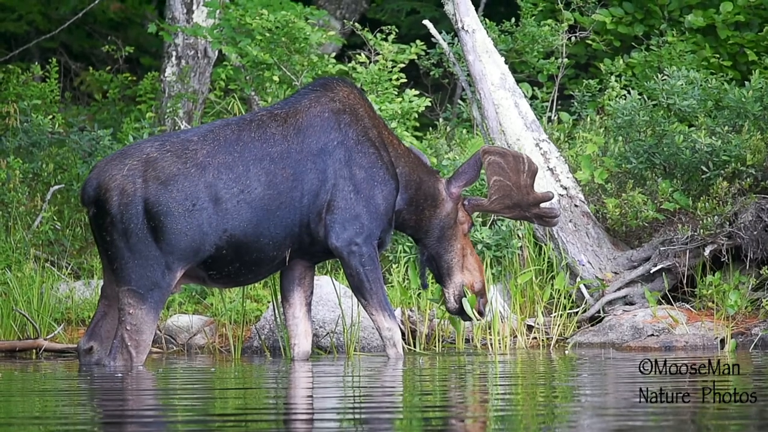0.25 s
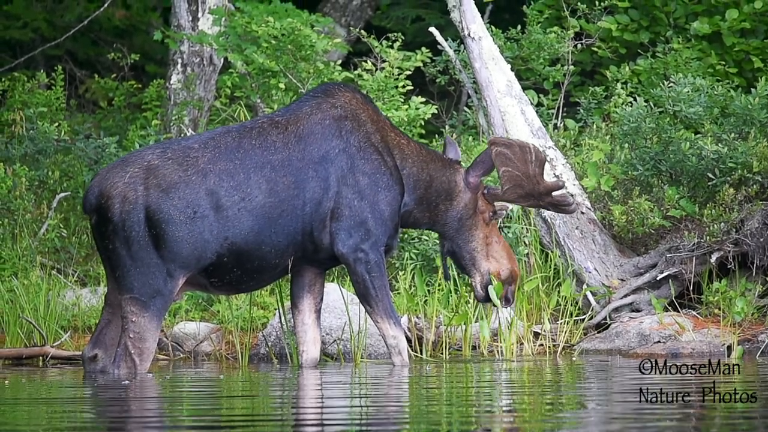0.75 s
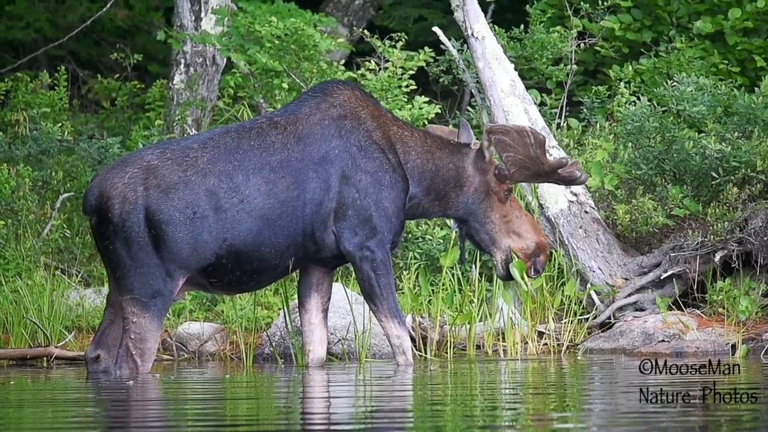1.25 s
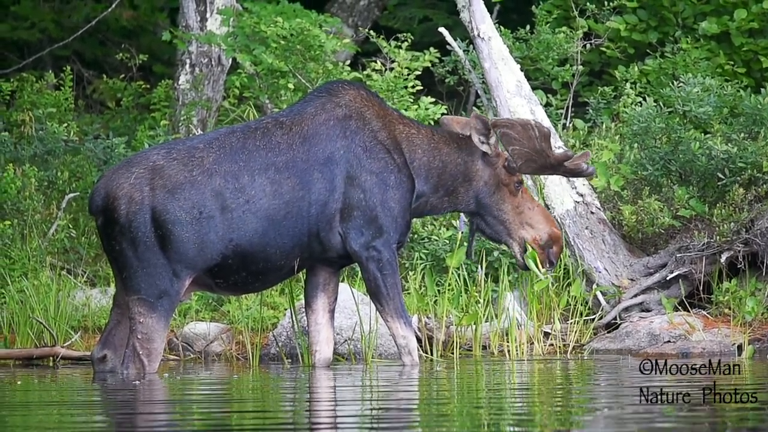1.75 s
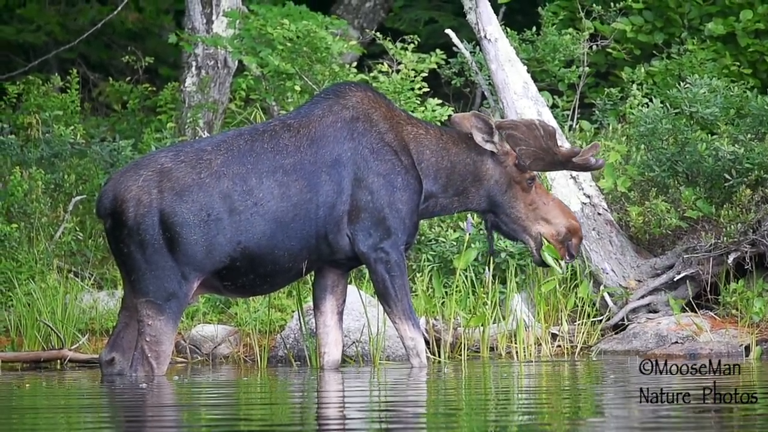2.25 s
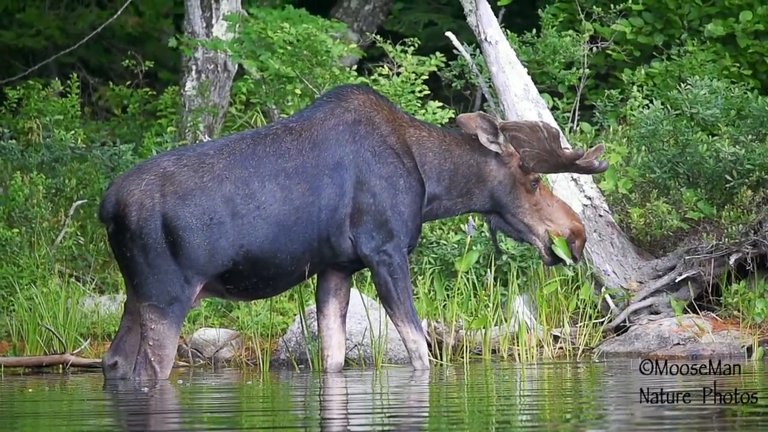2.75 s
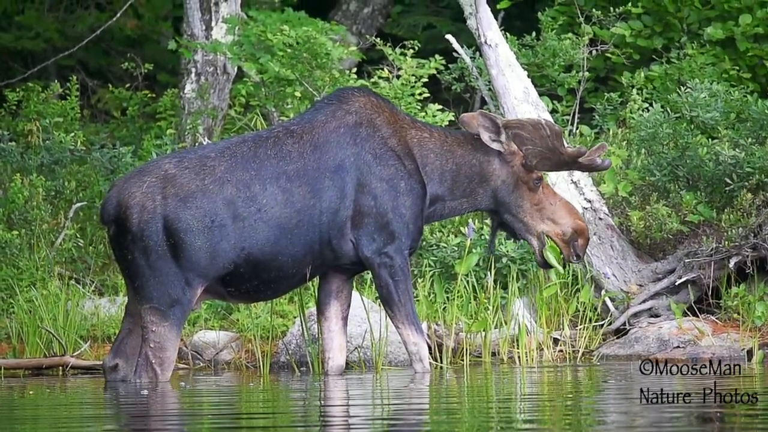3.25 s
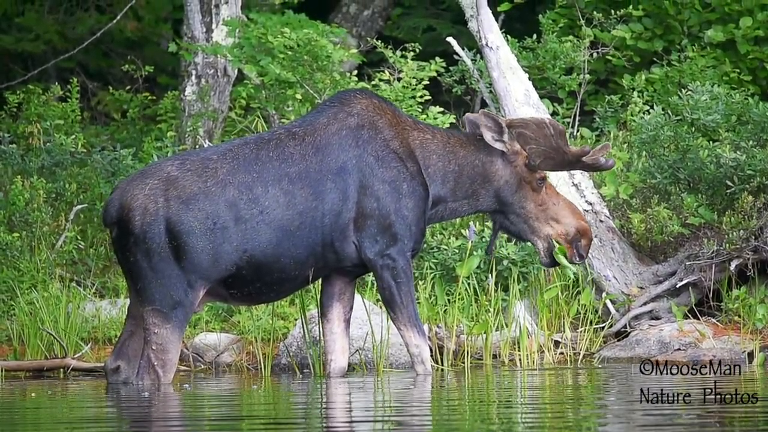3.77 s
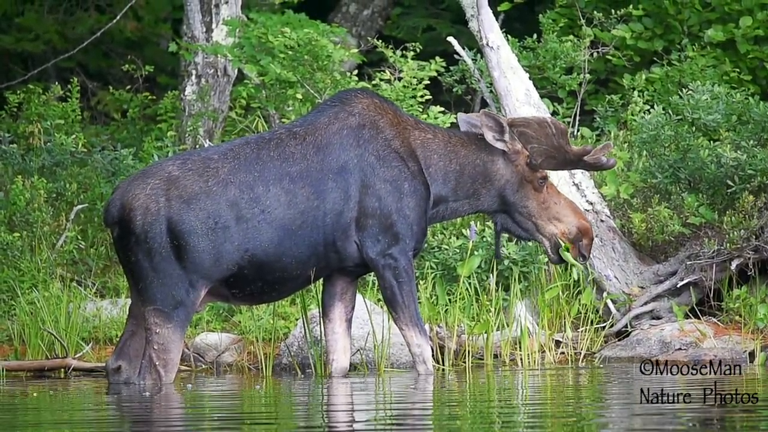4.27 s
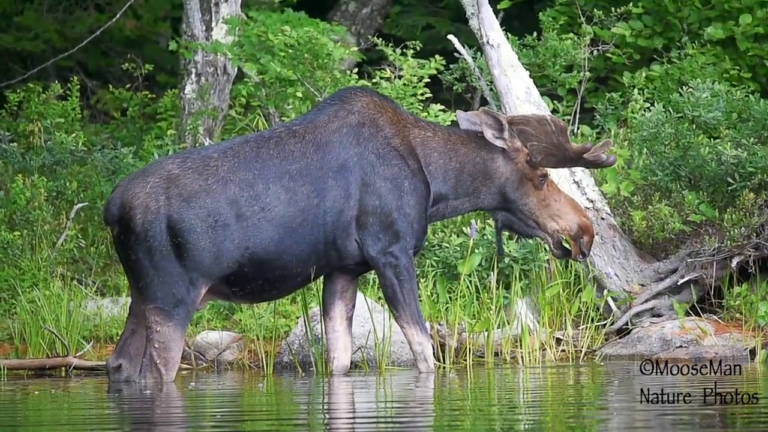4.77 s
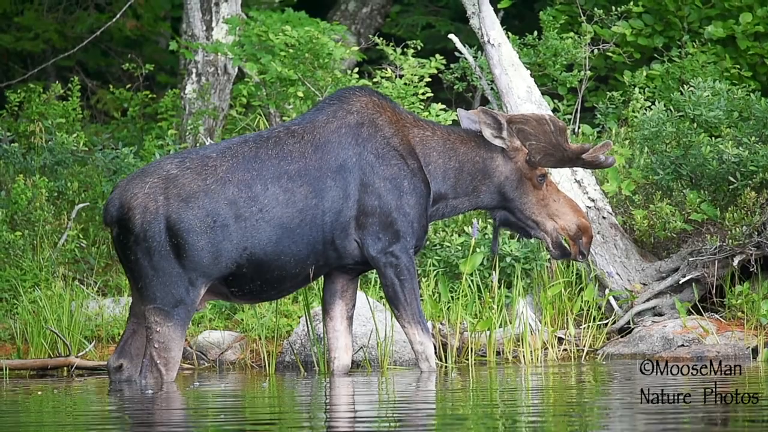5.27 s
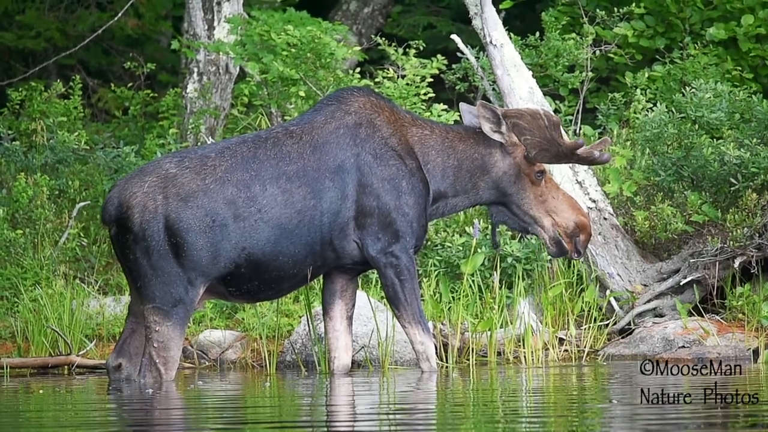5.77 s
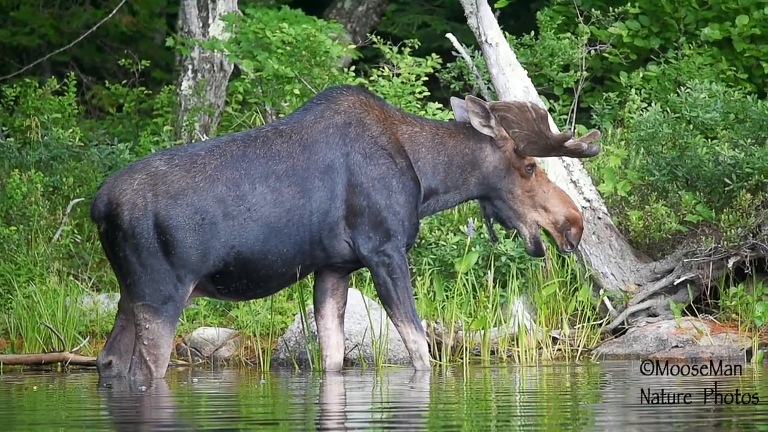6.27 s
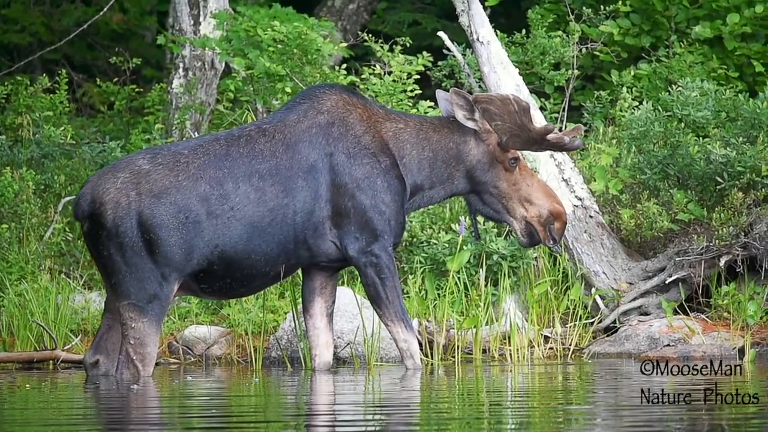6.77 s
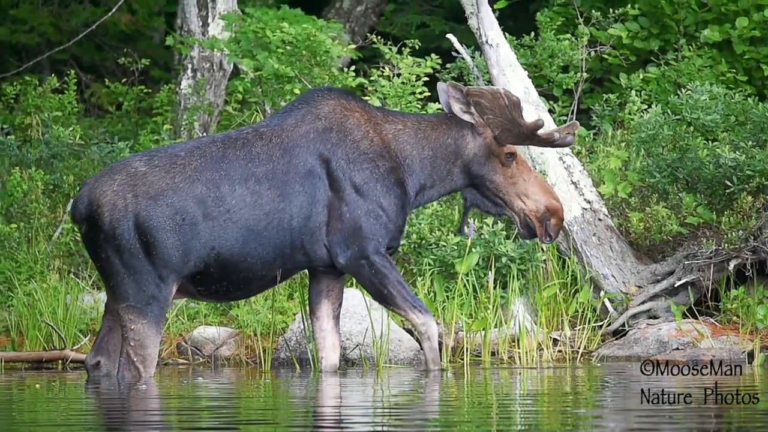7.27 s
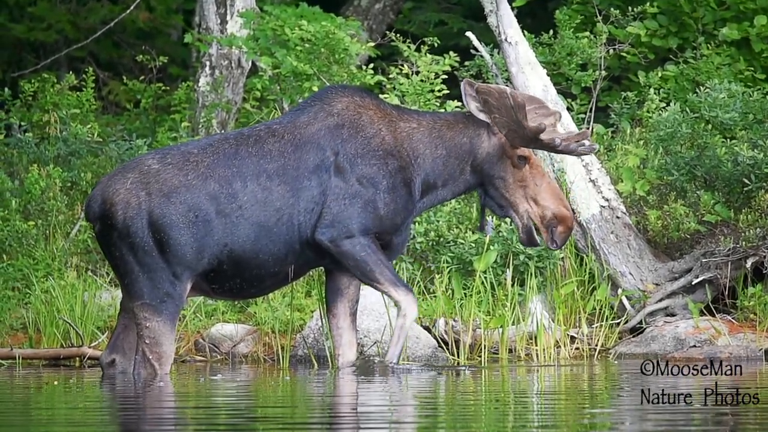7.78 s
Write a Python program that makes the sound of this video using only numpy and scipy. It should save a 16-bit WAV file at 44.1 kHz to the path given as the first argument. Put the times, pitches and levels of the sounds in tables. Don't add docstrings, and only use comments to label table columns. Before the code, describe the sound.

A calm forest lake outdoors: a soft, broad hush of distant trees and water, with low wind rumble on the microphone, strongest in the first second and nearly gone by 7 s. From the start a moose feeds in the shallows, with wet leaves snapping and rustling irregularly, a quick tearing at 0.6 and 4.7 s, and scattered drips plinking or plopping. Far songbirds whistle thin falling chirps, busiest from 1.3 to 2.3 s. At 2.45 s a loon sounds a short low note that breaks into a clear, rapid high quaver until 3.1 s, dropping at the end. A second, longer call runs from 3.5 to 4.3 s. Forested shores return both as a diffuse smear fading through about 7 s. From 7.4 s to the end at 8 s, the moose steps: gulping bubbles, frothy splash and last leaf crunches.

```python
import sys
import numpy as np
from scipy import signal
from scipy.fft import rfft, irfft, next_fast_len
from scipy.io import wavfile
from scipy.ndimage import uniform_filter1d

SR = 44100
rng = np.random.default_rng(int(sys.argv[2]) if len(sys.argv) > 2 else 0)


def store_pcm(level_fs):
    pcm = np.round(np.clip(level_fs, -1, 1) * 32767).astype(np.int16)
    wavfile.write(sys.argv[1], SR, np.atleast_2d(pcm).T)


def ratio_of_db(decibels):
    return 10 ** (np.asarray(decibels, float) / 20)


N = 354123


def band(x, lo_hz, hi_hz):
    return signal.sosfilt(signal.butter(2, [lo_hz, hi_hz], "bandpass", fs=SR, output="sos"), x)


def walk(rate):
    k = int(SR / rate)
    held = np.repeat(rng.standard_normal(N // k + 1), k)
    return 1.9 * uniform_filter1d(uniform_filter1d(held, k), k)[:N]


def add(out, start_s, piece):
    i = int(start_s * SR)
    out[i:i + len(piece)] += piece[:N - i]


def curve(rows):
    return ratio_of_db(np.interp(np.arange(N) / SR, *np.transpose(rows)))


def hush():
    # (frequency [Hz], density [dB per Hz])
    hush_spectrum = [(12, -29), (22, -13), (45, -10.5), (77, -1.5), (130, -5), (200, -6.5), (320, -12.5),
                     (450, -17), (1000, -18.5), (1600, -23), (2800, -25), (5000, -32), (11000, -41.5),
                     (16000, -49)]
    size = next_fast_len(N)
    f = np.fft.rfftfreq(size, 1 / SR) + 1
    hz, db = np.transpose(hush_spectrum)
    spectrum = rfft(rng.standard_normal(size)) * ratio_of_db(np.interp(np.log(f), np.log(hz), db))
    out, swell = 0, walk(1.0)
    for k in range(-1, 10):
        octave = np.cos(np.pi / 2 * np.clip(np.log2(np.maximum(f, 15.6) / 25.6) - k, -1, 1)) ** 2
        moving_db = .3 * swell + .5 * walk(1.2) + .7 * walk(9)
        out = out + irfft(spectrum * octave, size)[:N] * ratio_of_db(moving_db)
    return out * ratio_of_db(-44) / np.std(out)


def wind():
    # (time [s], level [dB])
    gusts = [
        (0, -48.5),
        (1, -50),
        (1.4, -55),
        (3, -59.5),
        (5, -56),
        (7.2, -86),
        (8.03, -62),
    ]
    rumble = band(rng.standard_normal(N), 18, 50)
    hollow = band(rng.standard_normal(N), 650.5, 667.6)
    hum_gain = ratio_of_db(-67 + 3 * walk(12))
    return curve(gusts) * rumble / np.std(rumble) + hum_gain * hollow / np.std(hollow)


def whistle(length_s, from_hz, to_hz, bend, db, hold_s=0):
    u = np.arange(0, length_s + hold_s, 1 / SR) / length_s
    way = np.minimum(u, 1)
    hz = from_hz + (to_hz - from_hz) * (4 * bend * way * (1 - way) + way * (2 * way - 1))
    fade_db = 10.5 * np.tanh(np.maximum(u - 1, 0) / .4)
    edges = signal.windows.tukey(len(u), .2 * length_s / (length_s + hold_s / 2))
    return ratio_of_db(db + 2.2 - fade_db) * edges * np.sin(2 * np.pi * np.cumsum(hz) / SR)


def songbirds():
    # (start [s], top [Hz], bottom [Hz], level [dB])
    falling = [(0.335, 5200, 3650, -58), (1.21, 4650, 3850, -64), (1.48, 4600, 3930, -52.5),
               (2.01, 5350, 4050, -57), (2.33, 4500, 2950, -63), (3.565, 4950, 4350, -61),
               (5.13, 5150, 4000, -63), (6.13, 5200, 3950, -62), (6.7, 5100, 3700, -67),
               (7.14, 5300, 3700, -64), (7.33, 5100, 3900, -66), (7.49, 3900, 3200, -64),
               (7.62, 3900, 3300, -68)]
    # (start [s], top [Hz], bottom [Hz], level [dB])
    replies = [
        (0.495, 5000, 3750, -56.5),
        (2.175, 5080, 4300, -58),
        (3.72, 5100, 4600, -61),
        (5.29, 5050, 4150, -61),
    ]
    # (start [s], from [Hz], to [Hz], level [dB], hold [s])
    slurs = [
        (1.325, 5200, 5800, -64, 0),
        (1.38, 4100, 4860, -60, .075),
        (1.585, 5150, 5500, -55.5, .07),
        (1.646, 3850, 4780, -53.5, .11),
        (1.735, 6110, 6150, -60, .125),
        (1.925, 5100, 5750, -55.5, .12),
        (3.93, 6400, 7250, -61, 0),
    ]
    # (start [s], length [s], from [Hz], to [Hz], level [dB])
    flicks = [
        (1.628, 0.028, 4530, 3850, -50),
        (1.797, 0.033, 5980, 5150, -53),
        (1.84, 0.054, 5500, 5000, -63),
        (1.889, 0.0217, 5010, 4040, -49.5),
        (1.905, 0.012, 4080, 4600, -53),
    ]
    song_bend = 0.54
    out = np.zeros(N)
    for chirps, bend in (falling, .35), (replies, .13):
        for s, top_hz, bottom_hz, db in chirps:
            length_s = .033 + (top_hz - bottom_hz) / 38000
            add(out, s, whistle(length_s, top_hz, bottom_hz, bend, db))
    for s, from_hz, to_hz, db, hold_s in slurs:
        add(out, s, whistle(.04, from_hz, to_hz, song_bend, db, hold_s))
    for s, length_s, from_hz, to_hz, db in flicks:
        add(out, s, whistle(length_s, from_hz, to_hz, song_bend, db))
    t = np.arange(int(.4 * SR)) / SR
    blur = rng.standard_normal(len(t)) * np.exp(-t / .1) * ratio_of_db(-35.5)
    return out * ratio_of_db(2 * walk(90)) + signal.fftconvolve(out, blur)[:N]


def water():
    # (time [s], peak [dB], pitch [Hz], ring [s])
    drips = [(0.25, -34.5, 1360, 0.036), (0.86, -39, 2230, 0.039), (1.0188, -20.5, 3200, 0.0063),
             (1.242, -32, 1410, 0.027), (1.6995, -13.5, 910, 0.0047), (1.9445, -15.5, 1060, 0.007),
             (2.045, -44, 3460, 0.024), (2.103, -29.5, 4220, 0.013), (2.104, -35, 2980, 0.014),
             (2.61, -38, 518, 0.13), (3.2, -36, 1016, 0.076), (3.645, -16.5, 332, 0.023),
             (4.3, -33, 410, 0.052), (4.955, -37, 1930, 0.026), (5.245, -26, 341, 0.049),
             (5.44, -35, 2293, 0.022), (7.814, -30, 1042, 0.15)]
    # (time [s], peak [dB])
    laps = [
        (2.47, -41),
        (2.62, -40),
        (2.99, -40),
        (3.72, -39),
    ]
    # (time [s], peak [dB], pitch [Hz])
    gulps = [(7.48, -39, 770), (7.497, -31, 800), (7.51, -36, 760), (7.555, -38, 1010), (7.59, -36, 680),
             (7.585, -41, 2150), (7.615, -37, 1370), (7.65, -36, 620), (7.685, -42, 3100),
             (7.708, -46, 4500), (7.714, -34, 528), (7.715, -37, 2130), (7.738, -39, 2400),
             (7.74, -47, 3600), (7.74, -28, 558), (7.764, -31, 544), (7.784, -22, 914), (7.8, -26, 850),
             (7.85, -30, 840), (7.852, -30, 1420), (7.868, -26, 600), (7.878, -37, 2700),
             (7.879, -41.5, 5400), (7.91, -36, 650), (7.92, -46, 4000), (7.945, -35, 600),
             (7.965, -35, 680), (7.98, -38, 800)]
    # (time [s], level [dB])
    froth = [
        (7.4, -64),
        (7.49, -49),
        (7.6, -48),
        (7.7, -47),
        (7.77, -43),
        (7.88, -42),
        (7.95, -43),
        (8.03, -44),
    ]
    s, db = np.transpose(froth)
    chance = rng.random((900, 3))
    times = s[0] + chance[:, 0] * (s[-1] - s[0])
    pitches = 450 * 2 ** (4.44 * chance[:, 1] ** 0.82)
    peaks_db = np.interp(times, s, db) + 6.5 - 3.0 * np.log(chance[:, 2]) - 3.8 * np.log2(pitches / 450)
    hollow_rings = [(*lap, 657, .13) for lap in laps]
    gulp_rings = [(s, db, hz, 0.056 * (800 / hz) ** 0.43) for s, db, hz in gulps]
    small = zip(times, peaks_db, pitches, 10 / pitches)
    out = np.zeros(N)
    for start_s, peak_db, hz, ring_s in [*drips, *hollow_rings, *gulp_rings, *small]:
        t = np.arange(int(ring_s * SR)) / SR
        rising = np.sin(2 * np.pi * hz * t * (.97 + 0.14 * t / ring_s))
        attack = 1 - np.exp(-t * hz / 2)
        add(out, start_s, ratio_of_db(peak_db) * rising * attack * 1000 ** (-t / ring_s))
    wash = band(rng.standard_normal(N), 450, 1300) + 0.15 * band(rng.standard_normal(N), 1300, 3900)
    return out + curve(froth) * ratio_of_db(11 + 2.2 * walk(30)) * wash


def tears():
    # (start [s], length [s], peak at 4-9 kHz [dB], duller part [dB], brighter part [dB])
    tear_runs = [
        (0.6055, .085, -44, -45, -51),
        (4.6823, .07, -46, -45, -55),
    ]
    gap_s, jitter_s, scatter_db, fade_db_s = .0125, .002, 2.5, 60
    rows = []
    for start_s, length_s, *dbs in tear_runs:
        for late_s in np.arange(0, length_s, gap_s):
            shift, *scatter = rng.standard_normal(4)
            time_s = start_s + late_s + jitter_s * shift * (late_s > 0)
            levels_db = np.array(dbs) + scatter_db * np.array(scatter) - fade_db_s * late_s
            rows.append((time_s, *levels_db))
    return rows


def rustle():
    # (start [s], hold [s], level [dB])
    bites = [
        (.12, 0.16, -63.5),
        (0.61, 0.038, -54.5),
        (.74, 0.088, -66),
        (1.537, 0.046, -58.5),
        (3.45, .22, -60.5),
        (4.15, .02, -55.5),
        (4.684, 0.064, -56.5),
        (7.52, 0.26, -63.5),
        (7.84, 0.13, -59.5),
    ]
    swell_db_s, fade_db_s = 250, 92
    t = np.arange(N) / SR
    power = ratio_of_db(-66.5) ** 2
    for s, hold_s, db in bites:
        before_s = np.maximum(s - t, 0)
        after_s = np.maximum(t - s - hold_s, 0)
        power = power + ratio_of_db(db - swell_db_s * before_s - fade_db_s * after_s) ** 2
    return np.sqrt(power)


def leaves():
    # (time [s], peak at 4-9 kHz [dB], duller part [dB], brighter part [dB])
    lone_snaps = [(0.0504, -41, -47, -69), (0.1301, -42, -54, -58), (0.155, -32, -44, -59),
                  (0.2034, -39, -58, -64), (0.225, -47, -48, -62), (0.5948, -34, -48, -42),
                  (0.7138, -43, -58, -64), (0.7625, -32, -58, -60), (0.7718, -41, -42.5, -62),
                  (1.0003, -40, -45.5, -55), (1.4694, -46, -41.5, -61), (1.7015, -54, -41, -67),
                  (2.7122, -37.5, -48, -67), (2.9324, -53, -46, -52), (3.1744, -52, -41, -67),
                  (3.4208, -29, -38, -49), (3.6491, -45, -50, -54), (4.1434, -50, -42, -51),
                  (4.1535, -39, -43, -69), (4.5594, -43, -59, -58), (4.5714, -38, -56, -53),
                  (5.78, -50, -47, -63), (6.0584, -49, -44, -66), (7.5044, -47, -51, -59),
                  (7.5994, -44, -47, -61), (7.744, -40, -44, -53), (7.879, -37, -44, -58),
                  (7.92, -43, -51, -55)]
    t = np.arange(int(.03 * SR)) / SR
    decay = np.exp(-t / 0.00055) + 0.13 * np.exp(-t / .005)
    layers = np.zeros((3, N))
    snaps = lone_snaps + tears()
    for (s, *dbs), noise in zip(snaps, rng.standard_normal((len(snaps), len(t)))):
        for layer, db in zip(layers, dbs):
            add(layer, s + .0006, ratio_of_db(db + 3.5) * noise * decay)
    flicker_db = 1.63 * walk(200) + 3.37 * np.array([walk(120) for _ in layers])
    balance = ratio_of_db(np.array([[-1], [-4], [-19]]))
    layers += rustle() * ratio_of_db(flicker_db) * rng.standard_normal((3, N)) * balance
    middle = band(layers[0], 4000, 9000)
    dull = band(layers[1], 1200, 4050)
    bright = band(band(layers[2], 9000, 13600), 8000, 13600)
    return ratio_of_db(-3.0) * middle + ratio_of_db(12.5) * dull + ratio_of_db(10.5) * bright


def shores(call):
    near_s, far_s = .26, 2.65
    t = np.arange(0, far_s + .3, 1 / SR)
    after = np.maximum(t - near_s, 0)
    near = ratio_of_db(-25 - 35 * after)
    woods = ratio_of_db(-23.5 - 11.5 * after)
    far = np.hypot(woods, ratio_of_db(-41 - 56 * np.maximum(t - far_s, 0)))
    swell_db = -62 * np.maximum(near_s - t, 0) + 2 * walk(25)[:len(t)]
    swell = ratio_of_db(swell_db) / np.sqrt(.1 * SR)
    bright = signal.fftconvolve(call, near * swell * rng.standard_normal(len(t)))[:N]
    dull = signal.fftconvolve(call, far * swell * rng.standard_normal(len(t)))[:N]
    return band(bright, 600, 1500) + band(band(dull, 600, 1180), 600, 1400)


def voice(hz, db, overtones_db):
    phase = 2 * np.pi * np.cumsum(hz) / SR
    tone = sum(ratio_of_db(db + level_db) * np.sin((k + 1) * phase + k) for k, level_db in enumerate(overtones_db))
    return 2 ** .5 * tone * signal.windows.tukey(len(hz), min(.004 * SR / len(hz), 1))


def dips(rows):
    crest_s, crest_hz, crest_db, sag_hz = np.transpose(rows)

    def between(v):
        return (v + np.append(v[1:], v[-1])) / 2

    depth_db = np.append(np.full(len(rows) - 1, 8.2), 12.5)
    fall_s = np.minimum(.0395 + .1 * (crest_s - crest_s[0]) ** 2, .059)
    return crest_s + fall_s, between(crest_hz) - sag_hz, between(crest_db) - depth_db


def loon(dip_lift_db, low_lift_db):
    call_start_s = [
        2.5635,
        3.667,
    ]
    # (crest [s], crest [Hz], crest [dB], sag after it [Hz])
    quavers = [
        [(2.578, 1326, -20.4, 118), (2.663, 1326, -20.0, 148), (2.752, 1358, -17.1, 162),
         (2.842, 1337, -17.4, 148), (2.933, 1301, -23.3, 121), (3.024, 1285, -23.1, 190)],
        [(3.68, 1258, -22.2, 142), (3.761, 1337, -19.1, 163), (3.847, 1357, -16.9, 146),
         (3.928, 1349, -17.0, 156), (4.021, 1361, -15.8, 165), (4.11, 1323, -18.6, 144),
         (4.208, 1244, -22.0, 149)],
    ]
    # (time [s], pitch [Hz], level [dB])
    low_notes = [
        [(2.452, 766, -62.5), (2.466, 748, -35.5), (2.482, 833, -26.5), (2.498, 867, -26.5), (2.515, 824, -30),
         (2.534, 790, -28.5), (2.55, 843, -28.5), (2.56, 896, -27), (2.566, 1040, -40.5)],
        [(3.086, 790, -54), (3.092, 745, -40), (3.115, 718, -32.5), (3.135, 700, -60.5)],
        [(3.52, 688, -55.5), (3.545, 696, -34.5), (3.566, 794, -30), (3.583, 816, -29.5), (3.605, 796, -28.5),
         (3.628, 760, -33), (3.645, 808, -27.5), (3.664, 897, -31), (3.67, 920, -48)],
        [(4.268, 805, -53), (4.274, 766, -40), (4.295, 732, -33), (4.32, 688, -55)],
    ]
    high_overtones_db = [.3, -25.5, -33.5, -46, -56, -60]
    low_overtones_db = [-19, -1, -21.5, -36.5, -32.5, -48.5, -46]
    dip_loss_db = [0, 3.5, 11.5, 17.5, 9.5, 15.5]
    out = np.zeros(N)
    for start_s, rows in zip(call_start_s, quavers):
        crest_s, crest_hz, crest_db, _ = np.transpose(rows)
        dip_s, dip_hz, dip_db = dips(rows)
        t = np.arange(start_s, dip_s[-1] + 0.0041, 1 / SR)
        turn = np.interp(t, np.ravel([crest_s, dip_s], "F"), np.arange(2 * len(rows)))
        slack = np.sin(np.pi * turn / 2) ** 2
        sag = slack ** np.where(turn % 2 < 1, 1.1, 1.6)
        hush_share = slack ** .9
        hz = np.interp(t, crest_s, crest_hz) * (1 - sag) + np.interp(t, dip_s, dip_hz) * sag
        breaking = (1 - np.tanh((t - start_s - .0032) / .001)) / 2
        hz = hz * (1 - .2 * breaking)
        db = np.interp(t, crest_s, crest_db) * (1 - hush_share)
        db = db + np.interp(t, dip_s, dip_db + dip_lift_db) * hush_share
        effort_db = np.outer(np.arange(len(dip_loss_db)), .4 * (db + 18))
        overtones_db = np.array(high_overtones_db)[:, None] - np.outer(dip_loss_db, slack ** 2.6) + effort_db
        add(out, start_s, voice(hz, db - 16 * breaking, overtones_db))
    for note in low_notes:
        s, hz, db = np.transpose(note)
        t = np.arange(s[0], s[-1], 1 / SR)
        hz = uniform_filter1d(np.interp(t, s, hz), size=200)
        strain_db = np.outer(np.arange(len(low_overtones_db)) != 1, 65 * (hz / 815 - 1))
        overtones_db = np.array(low_overtones_db)[:, None] + strain_db
        add(out, s[0], voice(hz, np.interp(t, s, db) + low_lift_db, overtones_db))
    return out * ratio_of_db(.35 * walk(60))


def scene():
    background = hush() + wind() + songbirds()
    feeding = water() + leaves()
    echo = shores(loon(dip_lift_db=8, low_lift_db=10))
    call = loon(dip_lift_db=2.5, low_lift_db=0.5)
    return (background + feeding + echo + call)[None]


def roll_off(x):
    return signal.sosfilt(signal.butter(12, 16450, fs=SR, output="sos"), x)


def record(dry):
    top = signal.ellip(8, .2, 60, 15750, fs=SR, output="sos")
    return roll_off(signal.sosfilt(top, dry))


dry = scene()
out = record(dry)
store_pcm(out)
```